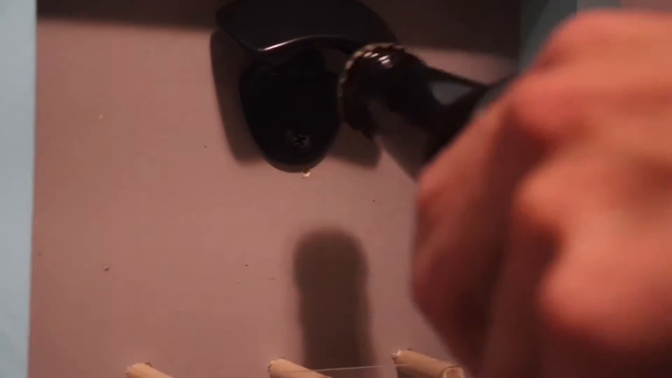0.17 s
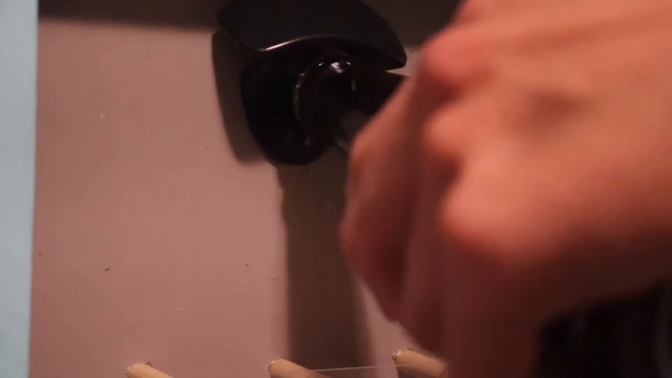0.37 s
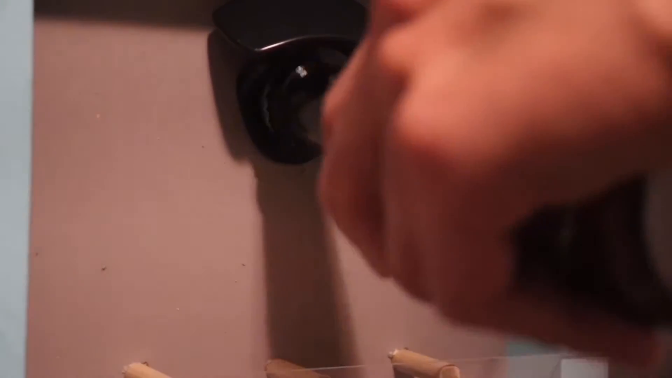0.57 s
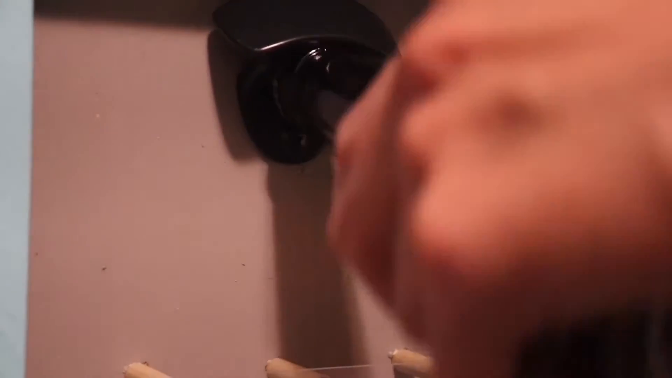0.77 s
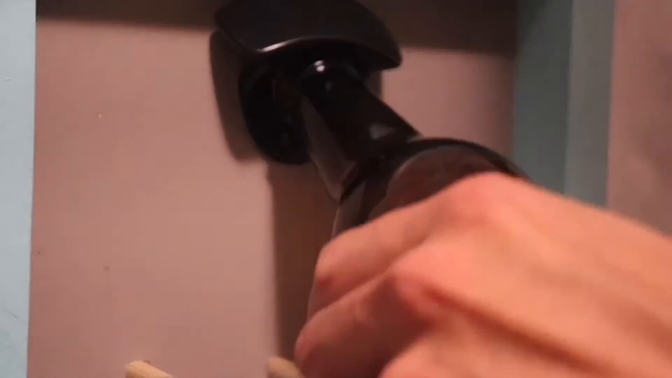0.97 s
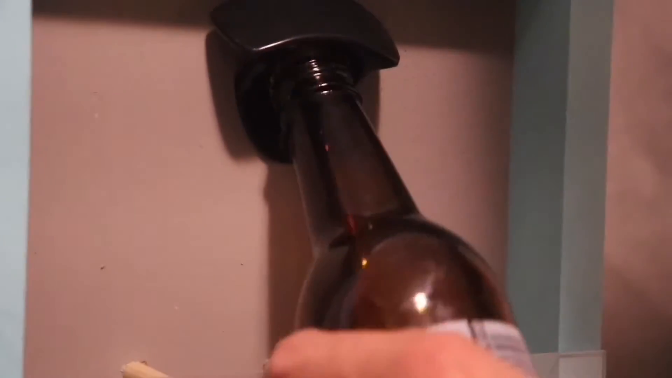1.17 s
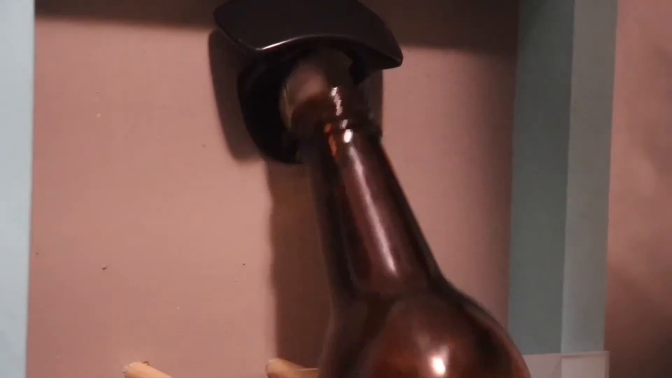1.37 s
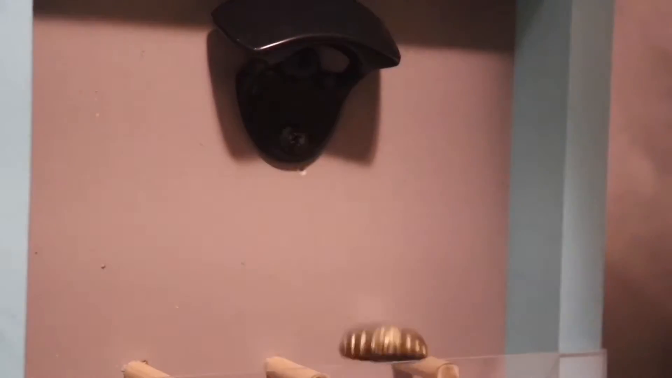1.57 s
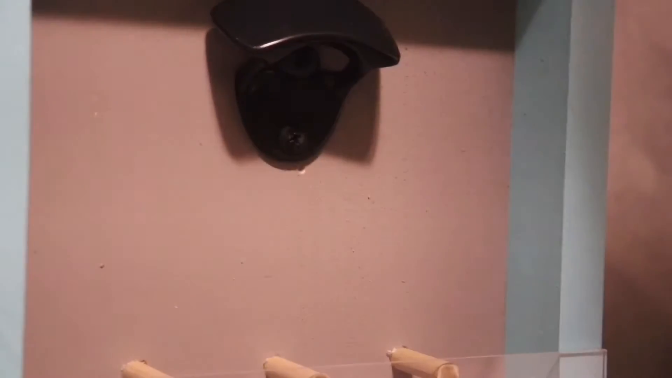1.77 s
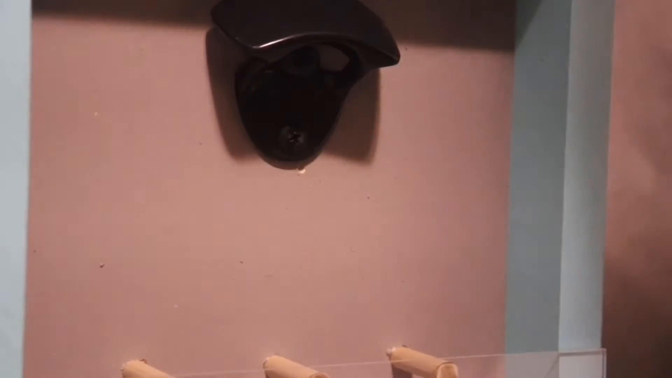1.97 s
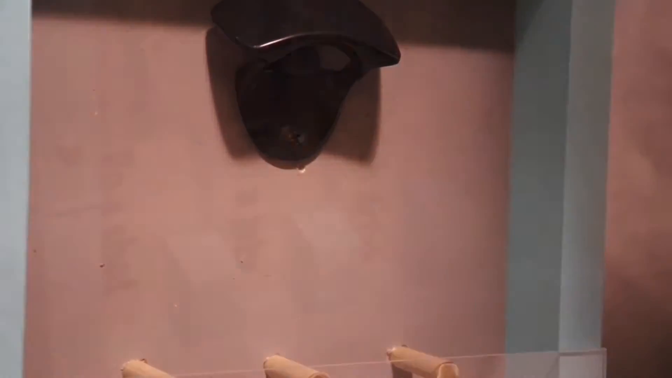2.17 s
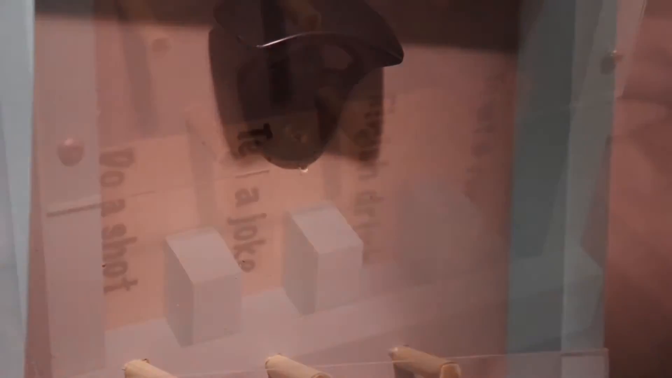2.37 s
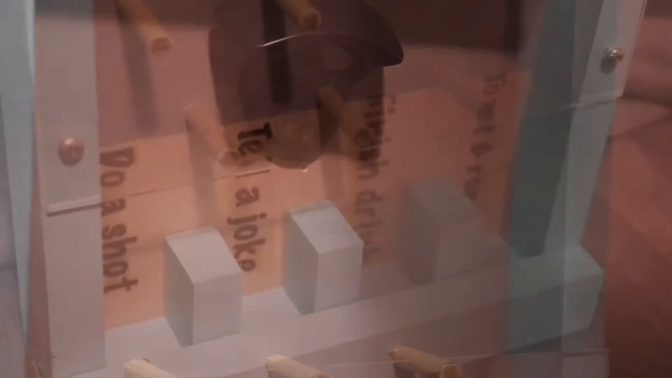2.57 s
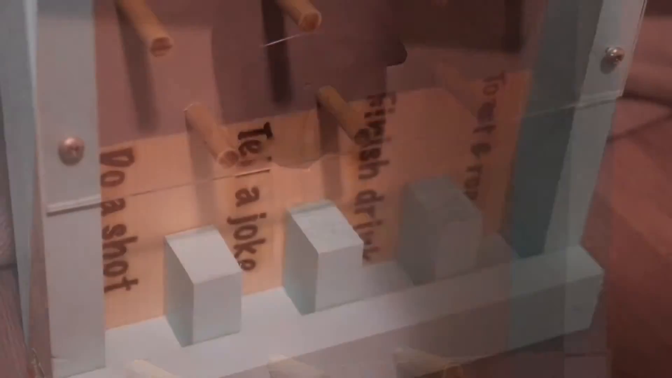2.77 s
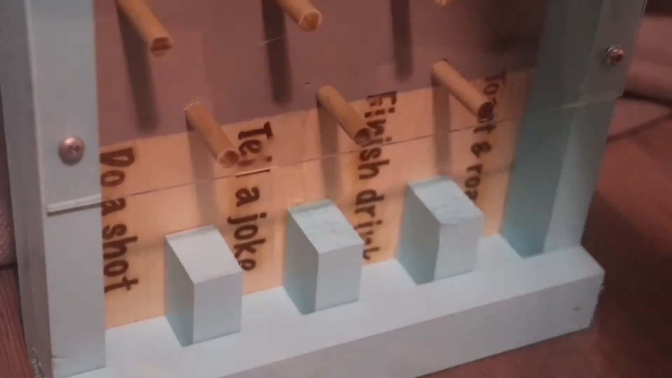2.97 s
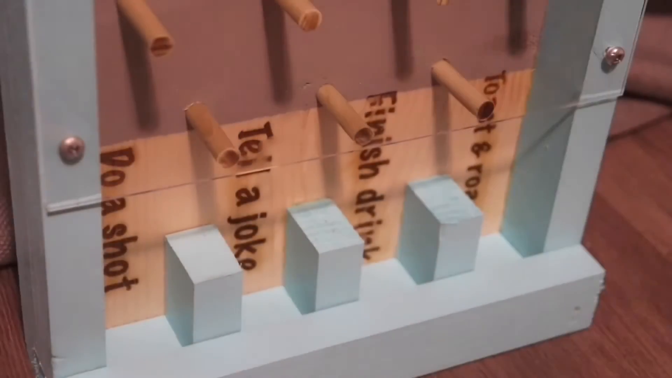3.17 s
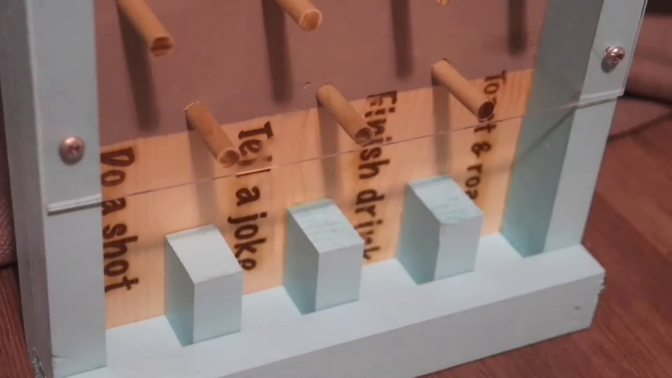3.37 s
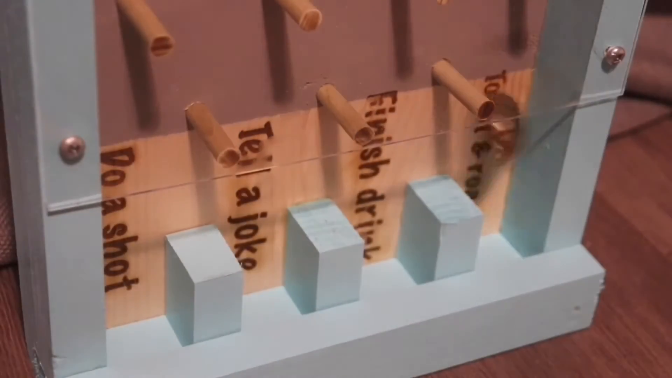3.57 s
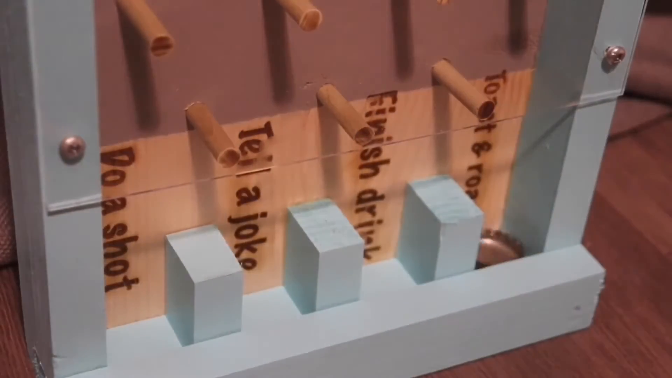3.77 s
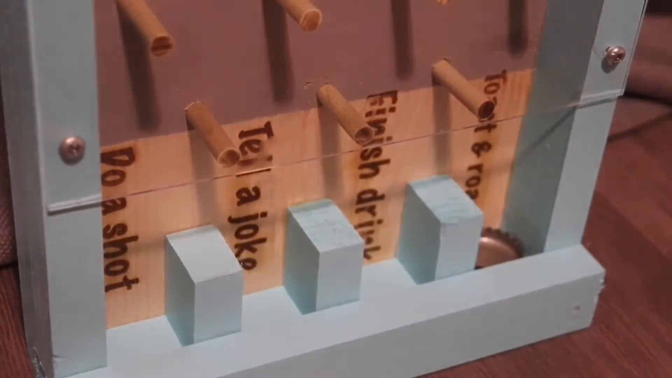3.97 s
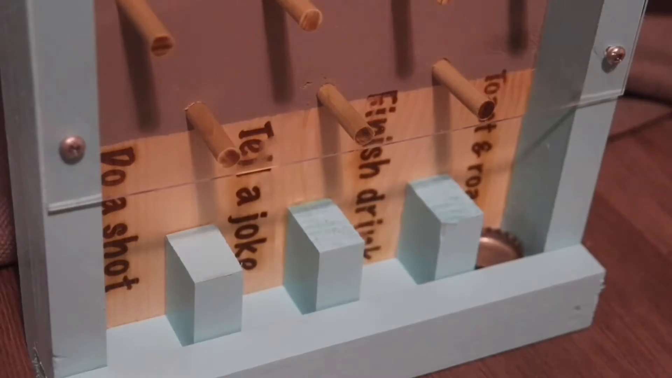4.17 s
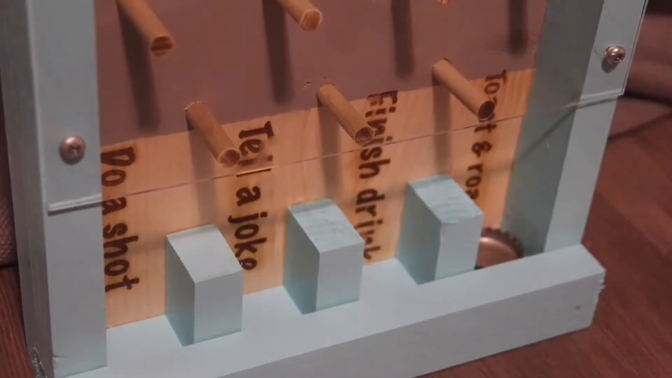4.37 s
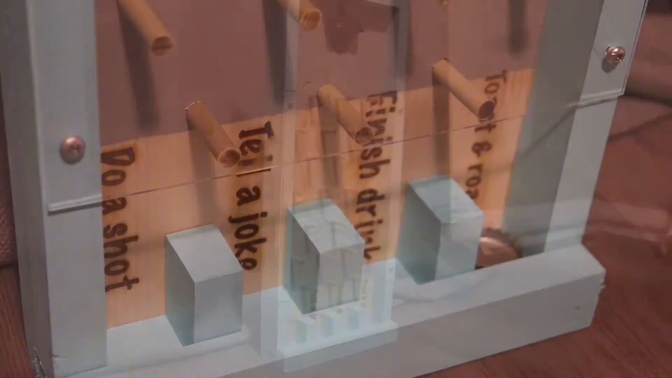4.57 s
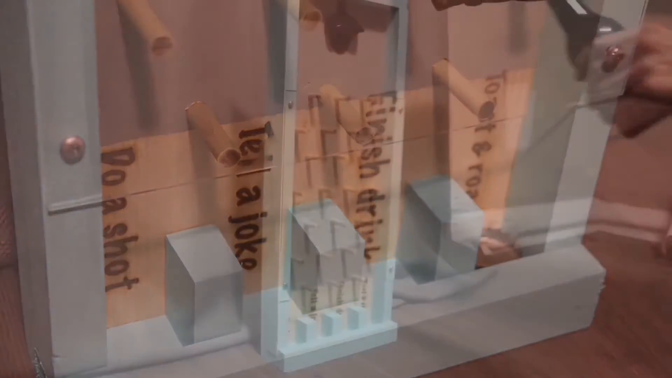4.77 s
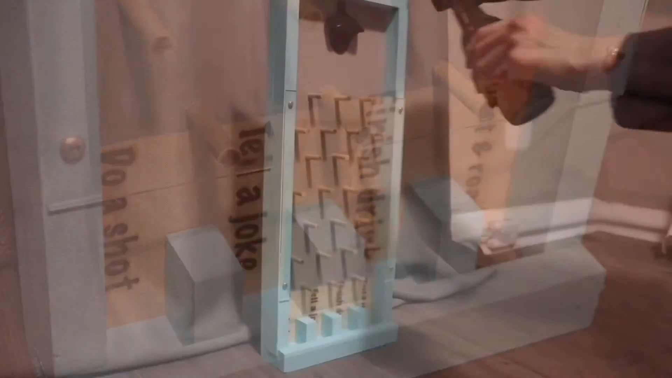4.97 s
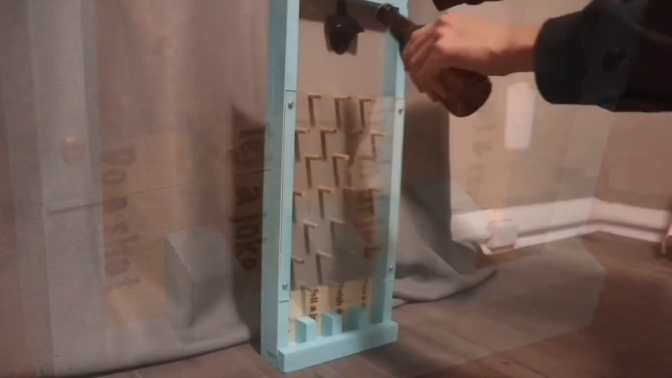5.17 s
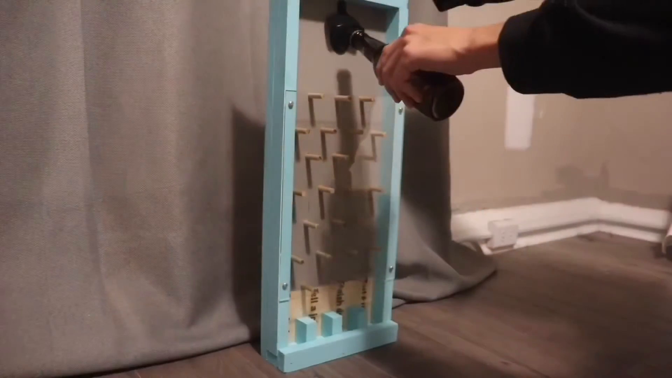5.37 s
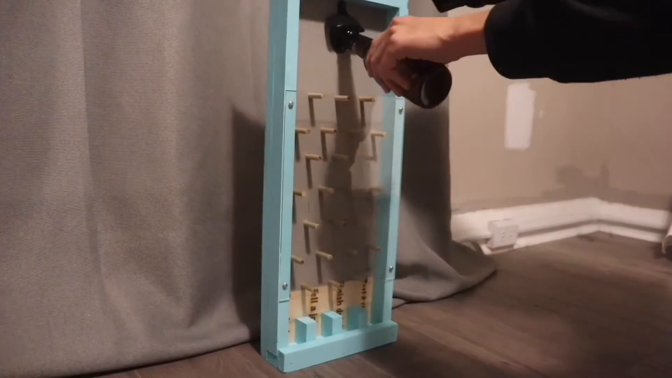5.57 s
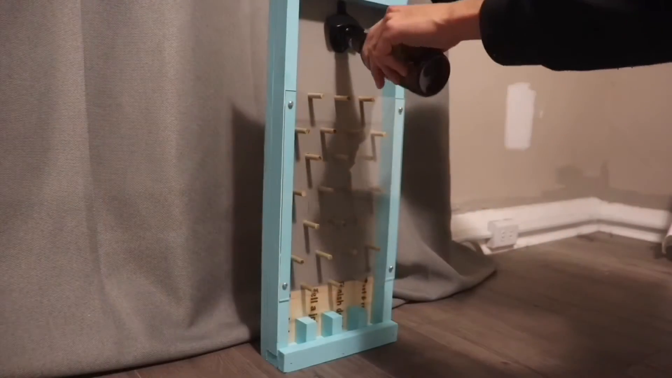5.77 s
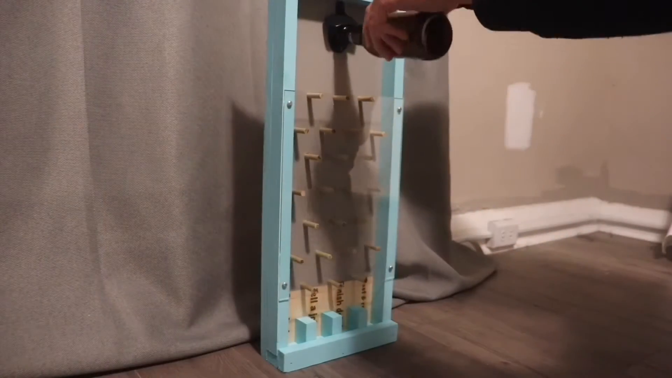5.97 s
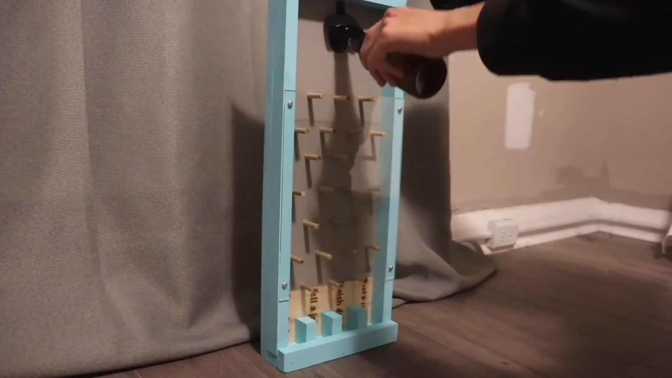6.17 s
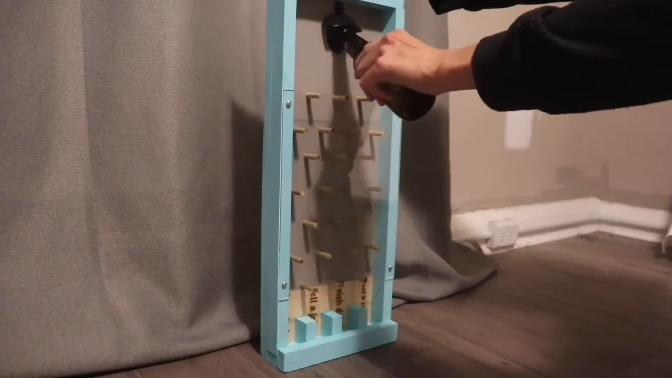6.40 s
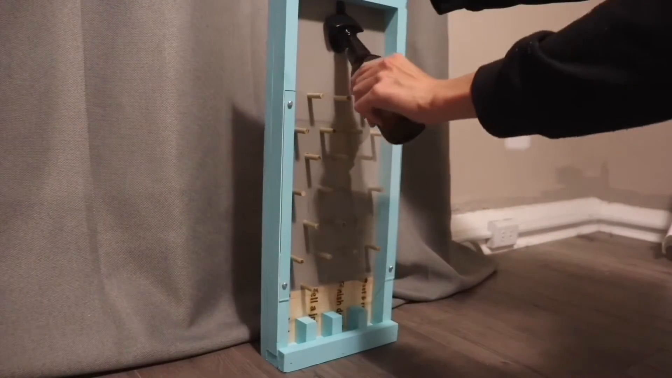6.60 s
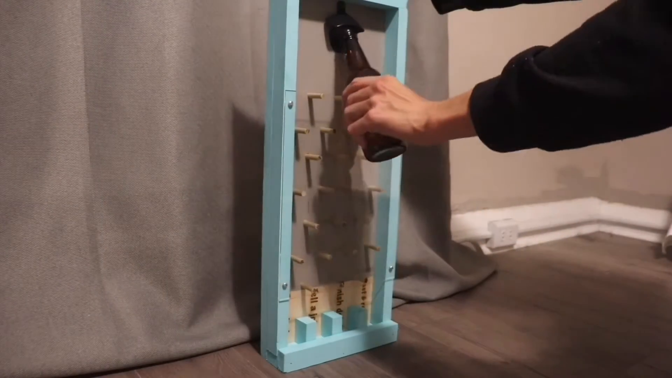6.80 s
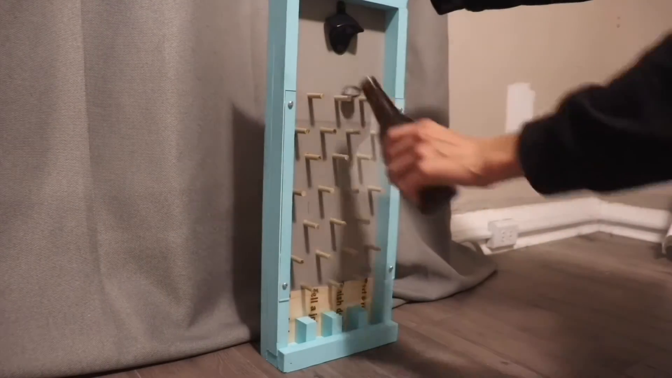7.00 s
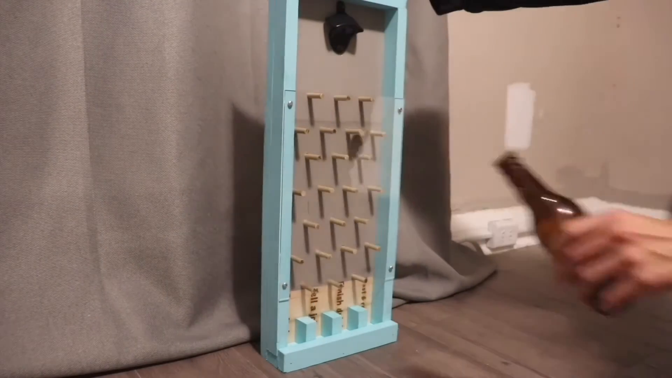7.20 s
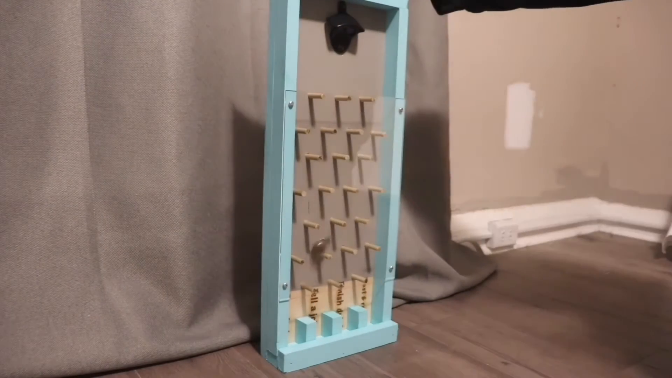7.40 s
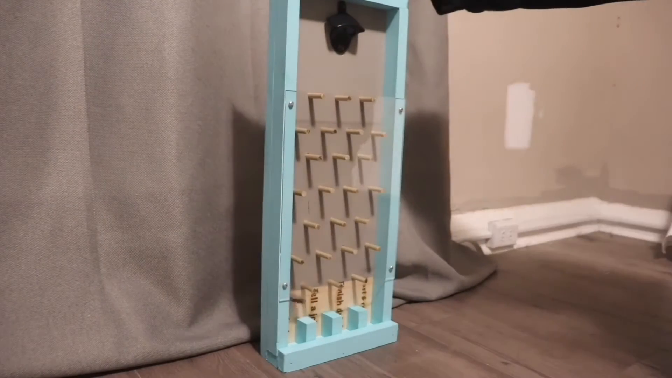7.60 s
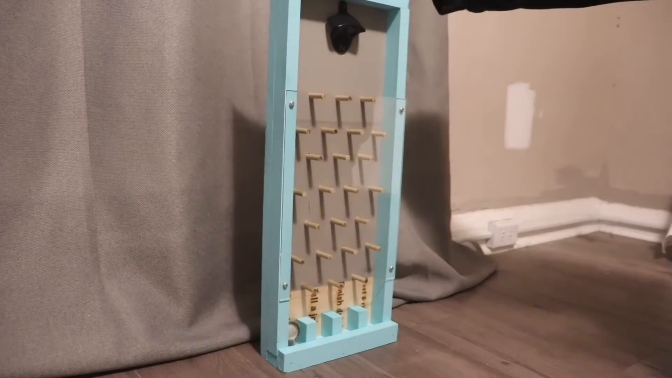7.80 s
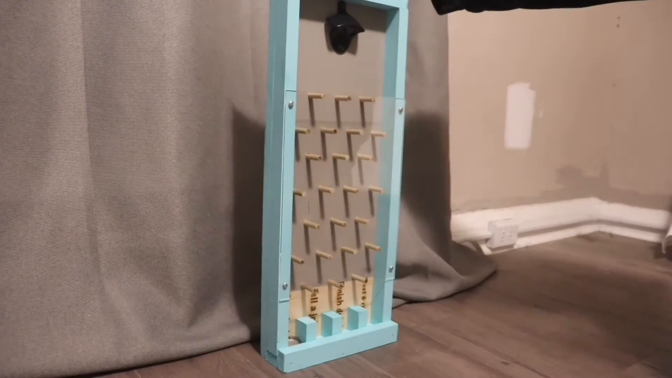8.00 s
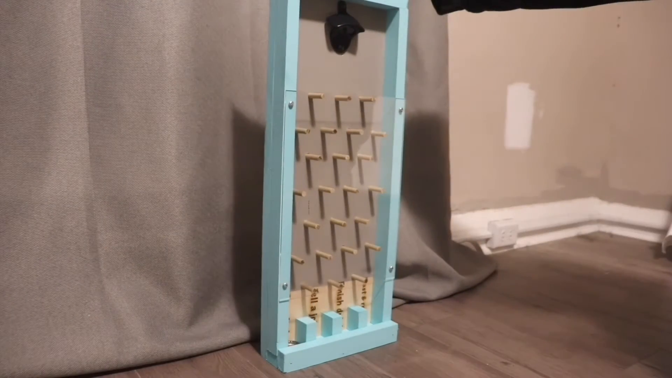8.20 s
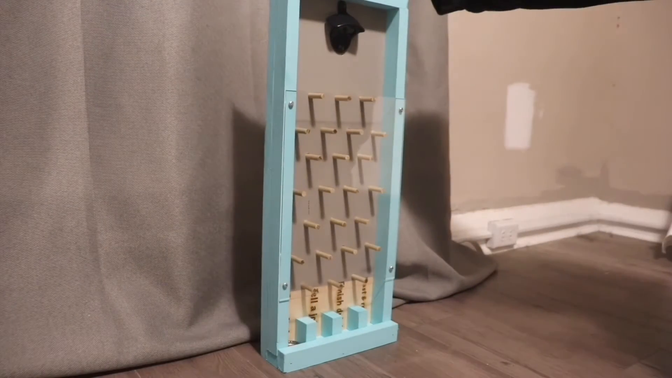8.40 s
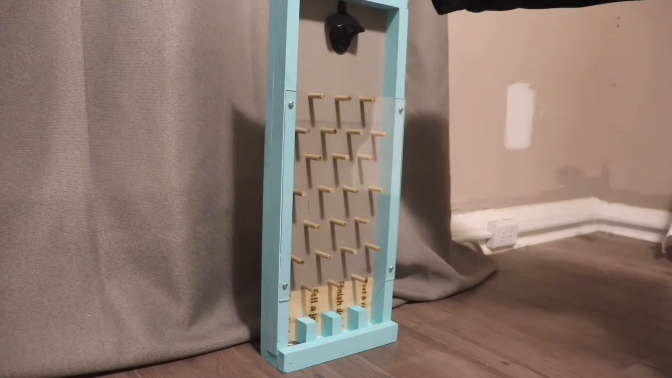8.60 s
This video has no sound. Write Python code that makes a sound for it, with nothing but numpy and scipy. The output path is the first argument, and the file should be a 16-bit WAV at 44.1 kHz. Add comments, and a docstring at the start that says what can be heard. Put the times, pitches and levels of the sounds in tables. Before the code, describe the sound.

A small furnished room with soft low rumble and faint hiss, heard close in stereo. From about 0.4 s a glass bottle bangs on an opener fixed to a hollow wooden board, loudest between 0.4 and 0.8 s, with a short gas hiss near 0.7 s. From 1.5 s a crimped steel cap falls through wooden pegs behind a plastic pane: quick irregular clacks, dull board taps, bright short metallic rings and scratchy skids. At 2.6 s a second run carries straight on, hard and crisp, ending near 3.9 s. Nearly quiet until a faint touch around 4.8 s. Knocks return at 5.5 to 5.9 s and 6.4 s, softer bumps between. A sharp fizz spurts at 6.85 s, then a third clatter runs from 6.9 s, with a strong scrape around 7.5 s, thinning to light ticks by 8.05 s. Short boxy echoes, more distant later, then room tone to 8.6 s.

```python
"""Bottle caps dropping down a peg board

A bottle knocks against a wall opener on a wooden board in a small furnished room, heard from close by
on two microphone ports. Gas hisses out, and caps clatter down pegs behind a plastic pane in three runs.
Blows are dying sines and short noise bursts; gas, skids and room tone are shaped noise.
Echoes from the box and the room follow, and the recorder ducks, overloads and cuts the top treble."""
import sys
import numpy as np
from scipy import signal
from scipy.fft import rfft, irfft, next_fast_len
from scipy.io import wavfile
from scipy.ndimage import uniform_filter1d

SR = 44100
rng = np.random.default_rng(int(sys.argv[2]) if len(sys.argv) > 2 else 0)


def store_pcm(level_fs):
    """Save levels as 16-bit WAV."""
    pcm = np.round(np.clip(level_fs, -1, 1) * 32767).astype(np.int16)
    wavfile.write(sys.argv[1], SR, np.atleast_2d(pcm).T)


N = 381280
EDGE_HZ = 16600  # upper edge of the ticks and of the recorder
CONTACT_S = 0.00025  # shortest onset of a blow


def gain_of(db):
    """Decibels to amplitude."""
    return 10 ** (np.asarray(db) / 20)


def evened(x):
    """Scales to rms 1."""
    return x / np.sqrt(np.mean(x ** 2) + 1e-20)


def read(points, hz, axis=1):
    """Reads one column of a table over log frequency."""
    table = np.array(points)
    return np.interp(np.log(hz + 1), np.log(table[:, 0] + 1), table[:, axis])


def add(mix, s, sound):
    """Mixes a stereo sound in at time s."""
    part = mix[:, round(s * SR):][:, :sound.shape[1]]
    part += sound[:, :part.shape[1]]


def noise(colour, same=None, size=1024):
    """Steady stereo noise of a given spectrum and left-right likeness, at rms 1."""
    hz = np.fft.rfftfreq(size, 1 / SR)
    hop = size // 4
    a, b, c, d = rng.standard_normal((N // hop + 5, len(hz), 4)).T
    like = .7 if same is None else np.clip(read(same, hz), -1, 1)[:, None]
    left = a + 1j * b
    right = like * left + np.sqrt(1 - like ** 2) * (c + 1j * d)
    spectrum = np.array([left, right]) * gain_of(read(colour, hz))[:, None]
    return evened(signal.istft(spectrum, nperseg=size, noverlap=size - hop)[1][:, :N])


def ring(modes, t, luck, contact, pitch=1., spread_db=3., lift_db=0., free=0.95):
    """Dying sines; a random strength and sign for each mode stand for where the blow lands."""
    hz, db, t60 = np.transpose(modes)[:, :, None]
    count = len(hz)
    share = gain_of(db + lift_db + spread_db * luck[:count, None]) * np.sign(luck[-count:, None])
    decay = gain_of(-60 * t / (t60 * free)) * (1 - np.exp(-(t / contact) ** 2))
    return (share * np.sin(2 * np.pi * hz * pitch * t) * decay).sum(0)


def burst(grit, t, lo_hz, hi_hz, t60):
    """A short puff of noise rings through a band."""
    sos = signal.butter(3, [lo_hz, hi_hz], "band", fs=SR, output="sos")
    puff = signal.sosfilt(sos, grit * gain_of(-60 * t / t60) * (1 - np.exp(-t / CONTACT_S)))
    return puff * np.sqrt(SR / 2 / (hi_hz - lo_hz))


# room tone over time: start_s, bass_db, hiss_db (the hiss before a 13 dB lift)
TONE_LEVELS = [(0, -58.5, -70.5), (.9, -65, -66.5), (1.15, -55.5, -68.5), (1.5, -60, -68), (2.2, -64, -72),
               (3, -57.5, -70.5), (4.6, -57.5, -74.5), (5.2, -63, -70.5), (8.65, -63, -71)]
# spectrum of the house rumble: freq_hz, relative_db
RUMBLE_COLOUR = [(12, -67.5), (20, -28), (36, -15.5), (76, -3), (107, 6.5), (201, -23), (289, -32),
                 (319, -3.5), (357, -36.5), (400, -27.5), (520, -54.5), (880, -120)]
# spectrum of the microphone hiss: freq_hz, relative_db
HISS_COLOUR = [(120, -24), (200, -1), (279, -19), (323, 1.5), (361, -20), (442, -10.5), (594, -12.5),
               (13700, -29.5), (16500, -42)]
# left-right likeness of the room tone: freq_hz, likeness (0 to 1)
TONE_LIKENESS = [(60, 1), (240, 0.19), (950, 0.14), (3770, 0.074), (15000, 0.25)]


def room_tone():
    """Low house rumble under the hiss of the microphone, both noise of slowly changing level."""
    s, bass_db, hiss_db = np.transpose(TONE_LEVELS)
    t = np.arange(N) / SR
    rumble = gain_of(np.interp(t, s, bass_db)) * noise(RUMBLE_COLOUR, TONE_LIKENESS, size=2048)
    hiss = gain_of(np.interp(t, s, hiss_db) + 13) * noise(HISS_COLOUR, TONE_LIKENESS)
    return rumble + hiss


# modes of the whole frame on the floor: pitch_hz, relative_db, t60_s (before a fixed factor of 0.95)
FRAME_MODES = [(97, -5.5, 0.14), (140.5, -4, 0.17), (202.1, -6.5, 0.24), (226.7, 5.5, 0.14)]


def frame_boom(t, luck):
    """The whole frame rocks on the floor in a few low, slowly dying modes."""
    return ring(FRAME_MODES, t, luck[3], CONTACT_S + 0.0012, lift_db=-4.0)


# low modes of the back board: pitch_hz, relative_db, t60_s (before the ring-out factor)
THUMP_MODES = [(335, -6.5, 0.11), (371, -8, 0.049), (450, 6.5, 0.078), (512, 10.5, 0.065), (584, -3.5, .07),
               (580, 8.5, 0.067)]


def board_thump(t, luck, grit, ring_out):
    """The back board bends in its low modes, with a dull puff of noise around them."""
    modes = ring(THUMP_MODES, t, luck[0], CONTACT_S + 0.0025, spread_db=2.5, lift_db=-7.0, free=ring_out)
    return modes + .5 * burst(grit[3], t, 210, 770, 0.067 * ring_out)


# upper modes of board and pane: pitch_hz, relative_db, t60_s (before the ring-out factor)
KNOCK_MODES = [(741.7, -0.5, .05), (762, -4, 0.092), (883, -3, 0.045), (982, -4, 0.087), (1032, -9, 0.14),
               (1149.5, -2, 0.054), (1265, 1, 0.044), (1403, -6.5, 0.068)]
KNOCK_SPOT_HZ, KNOCK_DB_PER_OCTAVE = 740, -2.5  # a spot pitched below this knocks less


def board_knock(t, luck, grit, spot_hz, ring_out):
    """Upper modes of board and pane; those close to the struck spot's pitch answer most."""
    mode_hz = np.array(KNOCK_MODES)[:, :1]
    near_db = -18. * abs(np.log2(mode_hz / max(spot_hz, KNOCK_SPOT_HZ)))
    modes = ring(KNOCK_MODES, t, luck[1], CONTACT_S + 0.000079, spread_db=2.5,
                 lift_db=near_db - 3, free=ring_out)
    return modes + 0.54 * burst(grit[0], t, 690, 1500, 0.041 * ring_out)


def clack(t, grit, clack_hz, ring_out):
    """The spot that is hit gives one short pitched click inside a wide crack."""
    click = 1.06 * burst(grit[1], t, clack_hz * .84, clack_hz * 1.16, 0.038 * ring_out)
    crack = burst(0.53 * grit[1] + 0.75 * grit[6:], t, 1700, 4600, 0.042 * ring_out)
    return click + crack


# modes of a cap, damped by its liner: pitch_hz, relative_db, t60_s (before pitch and ring-out factors)
CAP_MODES = [(4990, -18, .22), (5025, 0, .055), (5050, -16, .28), (6990, -5, .08), (7780, -2, .07),
             (10210, -5, .1), (11970, -7, .08), (13300, -5, .08), (14570, -1, .12)]
# pitch of the cap heard in each stretch, a little higher before 2.66 s and from 5 to 6.93 s:
# start_s, factor (on modes below 9 kHz)
CAP_PITCH_STEPS = [(0, 1.033), (2.66, 1), (5, 1.035), (6.93, 1)]


def cap_ring(t, s, luck, grit, ring_db, tick_db, air_db, ring_out):
    """The crimped steel cap rings; a harder, brighter blow wakes its higher modes."""
    mode_hz = np.array(CAP_MODES)[:, :1]
    low, main = mode_hz < 6000, mode_hz < 9000
    pitch = [factor for start, factor in CAP_PITCH_STEPS if start <= s][-1]
    pitch *= 1 + 0.0022 * luck[2, 12]
    high_pitch = 1 + .006 * luck[0, 8:17, None]
    middle_db = min(tick_db + 0.1, ring_db + 2.5)
    high_db = min(air_db - 2.5, ring_db - 3.5)
    wake_db = np.select([low, main], [ring_db + 11, middle_db], high_db)
    tone = ring(CAP_MODES, t, luck[2], CONTACT_S + 0.0013, pitch=np.where(main, pitch, high_pitch),
                spread_db=np.where(low, 1.2, 5.), lift_db=wake_db, free=np.where(main, ring_out, 0.95))
    # the cap tumbles, so the ring flutters
    flutter = evened(uniform_filter1d(uniform_filter1d(grit[4], 70), 70))
    return tone * (1 + 0.7 * np.minimum(t / .02, 1) * flutter)


def contact_ticks(t, grit, tick_db, air_db):
    """Very short treble bursts, partly different at the two ports as if by different paths."""
    fine = 0.92 * grit[5] + 1.3 * grit[6:]
    lower = gain_of(tick_db + 3) * burst(fine, t, 5100, 8200, 0.017)
    airy = gain_of(air_db + 4.5) * burst(fine, t, 8000, EDGE_HZ, 0.017)
    return lower + airy


THUMP_SPOT_HZ, THUMP_DB_PER_OCTAVE = 500, -8  # a spot pitched above this thumps less
AIR_DB = -8.5  # airy part of the tick against its lower part, before their own trims
PAN_SPREAD_DB = .8  # random spread of left minus right level


def strike(mix, s, board_db, boom_db, spot_hz, clack_db, clack_hz, ring_db, tick_db, pan_db, ring_out):
    """One blow sets off every part of board and cap, then chatters twice as it glances off."""
    t = np.arange(8000) / SR
    luck, grit = rng.standard_normal((4, 24)), rng.standard_normal((8, len(t)))
    air_db = tick_db + AIR_DB
    thump_db = board_db + THUMP_DB_PER_OCTAVE * max(np.log2(spot_hz / THUMP_SPOT_HZ), 0)
    knock_db = board_db + KNOCK_DB_PER_OCTAVE * max(np.log2(KNOCK_SPOT_HZ / spot_hz), 0)

    hard = gain_of(knock_db + 3) * board_knock(t, luck, grit, spot_hz, ring_out)
    hard = hard + gain_of(clack_db - 4.5) * clack(t, grit, clack_hz, ring_out)
    hard += contact_ticks(t, grit, tick_db, air_db)
    whole = hard + gain_of(boom_db + 6) * frame_boom(t, luck)
    whole += gain_of(thump_db - 2.5) * board_thump(t, luck, grit, ring_out)
    whole += cap_ring(t, s, luck, grit, ring_db, tick_db, air_db, ring_out)

    pan_db = pan_db + PAN_SPREAD_DB * luck[3, 12]
    stereo = gain_of([[pan_db / 2], [-pan_db / 2]])
    add(mix, s, whole * stereo)
    # the chatter repeats only knock, clack and ticks
    for wait, size, side in rng.random((2, 3)):
        sides = np.array([[1.5 - side], [.5 + side]])
        add(mix, s + .006 + .05 * wait, 0.14 * size * hard * stereo * sides)


# knocks of the bottle on the opener, levels before the trims of each part:
# start_s, board_db, boom_db, spot_hz, clack_db, clack_hz, cap_ring_db, tick_db
# (boom, clack, cap ring and tick are against the board; spot_hz is the pitch of the struck spot)
BOTTLE_BLOWS = [(0.13, -51, -6, 740, 2, 1770, -27, -10), (0.379, -5, -33, 1040, -7, 1750, -32.5, -34),
                (0.431, 3, -26.5, 710, -17, 3250, -42, -22.5), (0.55, -24.5, -19, 557, -14, 2030, -39, -27),
                (0.603, -2.5, -23, 830, -8, 1660, -35, -32), (0.636, 5, -41, 780, 3, 2910, -28, -8),
                (0.72, -15, -15, 751, 7, 2020, -33, -28), (0.784, -13, -16, 730, -10, 1620, -35, -33),
                (0.959, -18.5, -20, 760, -15, 1670, -59, -52), (1.007, -21, -5, 760, -2, 1680, -34, -11),
                (1.129, -30.5, -19, 750, 1, 1660, -37.5, -7),
                (1.306, -42.5, -15, 910, 4.5, 2060, -31.5, -27),
                (1.35, -40.5, -26, 779.5, -1, 3840, -3, -30),
                (4.797, -32, -21, 1050, 8, 1794, -28.5, -13.5),
                (4.997, -55.5, -16, 401, 11.5, 2660, -13, 7.5),
                (5.529, -3, -42, 1010, -14.5, 1830, -37, -47),
                (5.555, -7, -37, 1090, -12.5, 1600, -30, -44),
                (5.609, -7.5, -12.5, 552, -9, 1600, -48, -19.5),
                (5.762, -33.5, -9, 552, -17, 2020, -29, -25),
                (5.778, -12.5, -19.5, 868, -9.5, 2030, -37, -26),
                (5.857, -25, -21, 532, -20, 1670, -50, -45), (5.903, -20.5, -34, 880, -17, 1600, -54, -56),
                (6.031, -38, -21, 441, -28, 1600, -43, -36),
                (6.068, -36.5, -14, 552, -18.5, 1630, -46, -45),
                (6.11, -43, -6.5, 538, -4.5, 3400, -15, -3.5), (6.315, -33, -18, 602, -27, 2164, -52, -27),
                (6.422, -4, -18, 1315, -12, 1640, -37.5, -35), (6.78, -24.5, -5, 860, -4, 2320, -37, -18),
                (6.799, -31, -10, 431, 2.5, 2110, -19.5, -21)]
BOTTLE_RING_OUT, BOTTLE_PAN_DB = 0.79, -0.7  # factor on decay times; left minus right, before spread


def bottle_knocks():
    """The bottle hits the opener, so the board it hangs on and the cap both sound."""
    mix = np.zeros((2, N))
    for s, board, boom, spot_hz, clack_db, clack_hz, cap, tick in BOTTLE_BLOWS:
        strike(mix, s, board, board + boom, spot_hz, board + clack_db, clack_hz,
               board + cap, board + tick, BOTTLE_PAN_DB, BOTTLE_RING_OUT)
    return mix


# puffs of gas under the lifted cap: start_s, hiss_db, sizzle_db, hold_s, fall_db_per_s (of the hiss)
GAS_PUFFS = [(0.678, -36.5, -57, 0.039, 92), (6.123, -56.5, -50, 0.0068, 158),
             (6.34, -61, -61, 0.0076, 122), (6.849, -32.5, -36, 0.012, 200)]
# spectrum of the hiss: freq_hz, relative_db
GAS_HISS_COLOUR = [(1200, -29), (2200, 5.5), (4000, -5), (6500, 1), (8000, -13.5), (10000, -42)]
# spectrum of the thin sizzle: freq_hz, relative_db
GAS_SIZZLE_COLOUR = [(6500, -37), (8500, 1), (12000, 1.5), (15000, 0), (17000, -30.5)]
SIZZLE_FASTER = 2.4  # the sizzle falls this many times quicker in dB


def gas():
    """Hiss and sizzle hold for a moment, then fall with the pressure."""
    t, level = np.arange(N) / SR, np.zeros((2, N))
    for s, hiss_db, sizzle_db, hold, fall in GAS_PUFFS:
        drop_db = fall * np.maximum(t - s - hold, 0)
        level += (t >= s) * gain_of([hiss_db - drop_db, sizzle_db - SIZZLE_FASTER * drop_db])
    hiss, sizzle = uniform_filter1d(level, 300)
    return hiss * noise(GAS_HISS_COLOUR, size=256) + sizzle * noise(GAS_SIZZLE_COLOUR, size=256)


# the cap strikes pegs, board and pane, levels before the trims of each part:
# start_s, clack_db, board_db, spot_hz, peg_hz, cap_ring_db, tick_db
# (board, cap ring and tick are against the clack; spot_hz is the pitch of the struck spot)
CAP_BLOWS = [(1.3683, -26.5, -14.5, 822, 3820, -11.5, -33.5), (1.3764, -44.5, -10, 778, 1910, 6, -1.5),
             (1.4916, -1, -11.5, 820, 2920, -9.5, -20), (1.5064, -22, 0, 746, 2870, -19, -15),
             (1.5545, -0.5, -6.5, 541, 4100, -7, -20), (1.581, -9, -6, 503, 2020, -37.5, -16),
             (1.6153, -12.5, -21.5, 460, 2030, -6.5, -13), (1.6595, -23, -10.5, 746, 2670, -26.5, -25),
             (1.7075, -20.5, -1, 760, 1730, -19, -25.5), (1.72, -8, -3.5, 1480, 2570, -16, -17.5),
             (1.7494, -11, -10, 1470, 2080, -2.5, -9.5), (1.82, -12, -6, 1300, 3440, -13, -7),
             (1.8302, -15, -8.5, 511, 2240, -3, -9), (1.88, -5.5, -12.5, 859, 2690, -7, -12.5),
             (1.9066, -22.5, -6, 484, 2080, 2.5, -15), (1.9302, -13, -6, 522, 3050, -24, -12),
             (1.955, -2.5, -8, 514, 2290, -13, -8), (2.0305, -20, -2.5, 1220, 1710, -14.5, -15),
             (2.1267, -12, -3.5, 1000, 3100, -20.5, -10), (2.1444, -4, -1.5, 1300, 2450, -7.5, -10.5),
             (2.1614, -19, -5.5, 1026, 2450, 3.5, -1.5), (2.1794, -22.5, 1.5, 645, 2270, -11, -17.5),
             (2.2096, -26.5, -11, 1331, 2410, -1, -18), (2.245, -19.5, -11.5, 1366, 2080, -4.5, -16),
             (2.3306, -7.5, -12.5, 1234, 2440, -11, -27), (2.3784, -33.5, -3, 784, 1870, -4, -15),
             (2.4364, -15.5, -7, 1293, 3140, -3.5, -20.5), (2.4741, -25, -3, 775, 2260, -8.5, -5.5),
             (2.5082, -19, -7.5, 792, 2060, -28, -24), (2.604, -28, -6, 760, 2830, -19.5, -18),
             (2.6334, -26.5, 1.5, 1170, 2850, -14, -21), (2.6511, -27, 2, 692, 3350, -23, -15.5),
             (2.6997, -6, -10.5, 763, 2660, -6.5, -20.5), (2.7212, -14.5, -10, 516, 2690, -19, -2),
             (2.7615, -28, -12.5, 1278, 4440, -11.5, -13.5), (2.819, -7, -17.5, 778, 2650, -4.5, -17.5),
             (2.8547, -10, -9.5, 596, 2230, -17.5, -16), (2.9008, -9, -8, 746, 2110, -7.5, -24.5),
             (2.9547, -22, -5, 752, 2120, -13.5, -24.5), (3.0013, -24.5, -7, 746, 2220, -20, -21),
             (3.047, -2.5, -7.5, 759, 2400, -3.5, -12.5), (3.0944, -20.5, 0, 503, 2050, -5, -22),
             (3.1443, -17, 8.5, 601, 3430, -10.5, -16.5), (3.1617, -5.5, -12.5, 561, 2420, -9.5, -32),
             (3.1966, -18, -2, 545, 3030, -10, -15), (3.268, -2.5, -19, 797, 2680, 2, -14),
             (3.2764, -2.5, -15.5, 762, 2690, -5.5, -16.5), (3.3288, -27, -2, 743, 2660, 5.5, -17),
             (3.3593, -26, 4, 583, 2690, -10, -14.5), (3.4002, -10.5, -15, 1000, 2670, -19.5, -16),
             (3.4111, -15.5, -14, 738, 2623, -11, -15), (3.4922, -39, -4.5, 482, 2080, -14, -19.5),
             (3.5595, 3, -19.5, 1064, 2740, -6, -12), (3.6096, -1, -13, 774, 3060, -23.5, -17),
             (3.6243, -0.5, -12.5, 1044, 2240, -33.5, -35), (3.6443, -12, -7, 401, 4410, -13, -19),
             (3.67, -8.5, -13, 1104, 4430, -11, -22.5), (3.7414, -20, -6.5, 1230, 2290, -10.5, -12),
             (3.7464, -0.5, -19, 1310, 4190, -2, -29), (3.7713, -14, -12, 721, 4070, -9, -24),
             (3.8064, -26.5, 2, 730, 4230, -10.5, -25), (3.9034, -41, -2.5, 750, 2020, -13, -26),
             (6.8334, -43.5, -5, 899, 3470, -7.5, -4.5), (6.845, -26.5, -25.5, 567, 2160, -13, -21),
             (6.8678, -14, -14.5, 886, 4440, -9, -3), (6.9639, -9.5, -11, 1428, 1830, -23, -21),
             (6.9724, -12, -1.5, 1453, 1760, -11.5, -24), (7.0788, -8, -5.5, 1035, 3660, -11.5, -2.5),
             (7.1062, -6, -5, 1500, 1780, -12, -14.5), (7.167, -24, -1, 727, 2270, -13, -12.5),
             (7.2613, -17, -10, 463, 2200, -28, -25), (7.28, -6, -9.5, 606, 2200, -10.5, -11.5),
             (7.3382, -17, 2.5, 473, 3010, -16, -10), (7.3951, -15, 8.5, 583, 1600, -20, -12.5),
             (7.4084, -23, 7.5, 463, 2020, -18, -3), (7.4245, -19, -0.5, 576, 2710, -22, -20),
             (7.4445, -15, -19, 517, 2270, -5, -24), (7.4862, -14, -18.5, 770, 2640, -16, -28),
             (7.5022, -8, -11.5, 490, 2940, -23, -8.5), (7.5427, -15, -11.5, 506, 2300, -4.5, -19),
             (7.653, -5.5, -14, 1292, 1920, -14.5, -36), (7.6804, -14.5, -7, 1480, 1890, -12.5, -30),
             (7.7745, -12.5, -15, 1420, 1970, -20, -51), (7.7874, -18, -12.5, 1260, 2150, -17, -32),
             (7.7982, -18.5, -6.5, 1270, 2140, -22, -23), (7.857, -14, -11.5, 1300, 2010, -17.5, -21.5),
             (7.8892, -31, -0.5, 1250, 2020, -16, -17), (7.9172, -18, -18, 1450, 3910, -18, -41),
             (7.9254, -30.5, -17, 1290, 4500, 5, -22), (7.9394, -25, -25, 1030, 1810, -5, -32),
             (7.9544, -24, -10.5, 1050, 4390, -13, -29), (7.9992, -31, -3, 1040, 2150, -15, -33),
             (8.0416, -36, -10.5, 439, 1870, -23, -28)]
CAP_PAN_DB = -2.8  # left minus right, before spread: stronger at the right port
CAP_BOOM_DB = -30  # a light cap barely rocks the frame (against the board, before trims)
CAP_RING_OUT, HARD_DB, DAMPING_PER_DB = 0.83, -14, 0.01  # factor on decay times; harder hits die sooner


def cap_clatter():
    """The loose cap bounces from peg to peg; hard hits die sooner."""
    mix = np.zeros((2, N))
    for s, clack_db, board, spot_hz, peg_hz, cap, tick in CAP_BLOWS:
        board_db = clack_db + board
        ring_out = CAP_RING_OUT - DAMPING_PER_DB * max(clack_db - HARD_DB, 0)
        strike(mix, s, board_db, board_db + CAP_BOOM_DB, spot_hz, clack_db, peg_hz,
               clack_db + cap, clack_db + tick, CAP_PAN_DB, ring_out)
    return mix


# skids of the cap along board and pane between pegs, one list a run: start_s, level_db (before an 8 dB cut)
SKID_RUNS = [
    [(1.5, -56), (1.538, -41), (1.668, -32), (1.748, -37), (2.044, -40), (2.176, -34), (2.366, -41),
     (2.438, -28), (2.58, -35)],
    [(2.62, -30), (3.06, -41.5), (3.264, -39), (3.39, -22.5), (3.6, -55), (3.652, -35), (3.764, -40),
     (3.89, -63), (3.95, -64)],
    [(6.87, -56), (6.958, -53), (7.276, -40.5), (7.514, -15.5), (7.822, -69), (7.896, -48), (8.03, -62),
     (8.1, -64)],
]
# spectrum of the scratching: freq_hz, relative_db
SCRATCH_COLOUR = [(300, -33.5), (500, 2.5), (1100, 3), (2200, 0.5), (3800, -8.5), (4700, -7.5),
                  (5050, -0.5), (5500, -12), (9000, -18.5), (15000, -28)]


def skid():
    """The crimped rim scratches past in a patter of tiny uneven contacts."""
    t, level = np.arange(N) / SR, np.zeros(N)
    for run in SKID_RUNS:
        s, db = np.transpose(run)
        level += gain_of(np.interp(t, s, db, left=-120, right=-120) - 8.0)
    strength = gain_of(2.8 * np.minimum(rng.exponential(1, N), 4))
    contacts = strength * (rng.random(N) < 260 / SR)  # about 260 a second
    patter = signal.lfilter([1], [1, -np.exp(-1 / (0.005 * SR))], contacts)  # each lasts a few ms
    return uniform_filter1d(level, 400) * evened(patter) * noise(SCRATCH_COLOUR, size=256)


# echoes inside the box, between board and pane: left_s, right_s, share (of the treble)
BOX_ECHOES = [(.0004, .0006, 0.1), (.0011, .0008, -0.019), (.0019, .0023, .3), (.0034, 0.0042, -0.041)]


def box(x):
    """Quick echoes that reach each port at its own time, heard mostly in the treble."""
    bright = signal.sosfilt(signal.butter(1, 1500, "high", fs=SR, output="sos"), x)
    out = x.copy()
    for left_s, right_s, share in BOX_ECHOES:
        add(out[:1], left_s, share * bright[:1])
        add(out[1:], right_s, share * bright[1:])
    return out


# decay of the small furnished room: freq_hz, t60_s, relative_db
ROOM_DECAY = [(100, 0.14, -10.5), (300, 0.24, 4), (800, 0.29, -4.5), (2000, 0.23, -1.5), (5100, 0.34, -6),
              (11900, 0.067, 1.5)]


def room(x):
    """Sparse taps of random sign, each band dying at its own speed; three tails take turns."""
    out, size = np.zeros((2, N)), SR // 2
    slots = np.arange(200, size - 20, 20)
    for k in range(3):
        taps = np.zeros((2, size))
        at = slots + rng.integers(0, 20, (2, len(slots)))
        np.put_along_axis(taps, at, rng.choice([-1., 1.], at.shape), 1)
        hz, t, z = signal.stft(taps, SR, nperseg=256)
        like = 1 / (1 + (hz[:, None] / 1500) ** 2)  # bass is alike at both ports
        z[1] = like * z[0] + np.sqrt(1 - like ** 2) * z[1]
        t60 = read(ROOM_DECAY, hz)[:, None]
        band_db = read(ROOM_DECAY, hz, axis=2)[:, None]
        z *= gain_of(band_db - 60 * t / t60) / np.sqrt(t60 * 2205 / np.log(1e6))  # equal energy at any t60
        tail = signal.istft(z, SR, nperseg=256)[1]
        turn = np.sqrt(2 / 3) * abs(np.cos(np.pi * (np.arange(N) / SR * 2.3 + k / 3)))
        out += signal.fftconvolve((x * turn)[None], tail, axes=1)[:, :N]
    return out


# echo level, rising as the microphone stands further off: start_s, level_db
ECHO_LEVELS = [(0, -0.5), (2.3, -2), (2.8, -5), (4.5, -1), (5.202, 1), (8.65, 3)]


def scene():
    """Blows, gas and skids near the board, their echoes and the room tone."""
    near = bottle_knocks() + gas() + cap_clatter() + skid()
    wet = gain_of(np.interp(np.arange(N) / SR, *np.transpose(ECHO_LEVELS)))
    return box(near) + room(wet * near.mean(0)) + room_tone()


RIGHT_LAG_S = 2.3e-5  # delay of the right microphone port


def record(dry):
    """Port delay, gain control that lags behind each blow, overload at full scale, band limit."""
    size = next_fast_len(N)
    z = rfft(dry, size)
    z[1] *= np.exp(-2j * np.pi * np.fft.rfftfreq(size, 1 / SR) * RIGHT_LAG_S)
    heard = irfft(z, size)[:, :N]
    power = signal.lfilter([.012], [1, -.988], (heard ** 2).mean(0))
    power_db = 10 * np.log10(power + 1e-12)
    fall = np.arange(N) * 106.4 / SR  # recovery of 106.4 dB a second
    held_db = np.maximum.accumulate(power_db + fall) - fall
    over_db = np.maximum(held_db + 18, 0)  # acts above -18 dB
    ducked = heard / gain_of(0.49 * signal.lfilter([.008], [1, -.992], over_db))
    loud = np.clip(ducked, -1, 1)
    band_limit = signal.firwin(511, EDGE_HZ, window=("kaiser", 9), fs=SR)
    return signal.oaconvolve(loud, band_limit[None], "same")


dry = scene()
out = record(dry)
store_pcm(out)
```